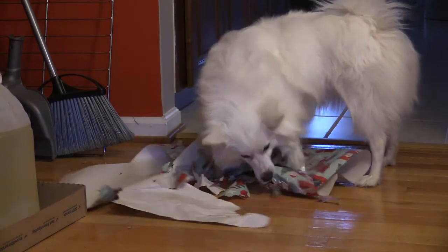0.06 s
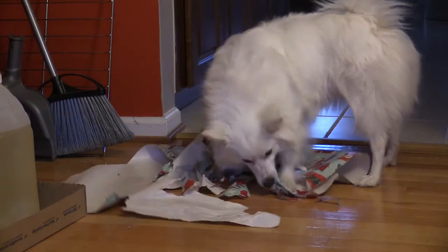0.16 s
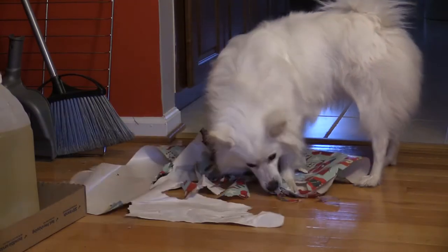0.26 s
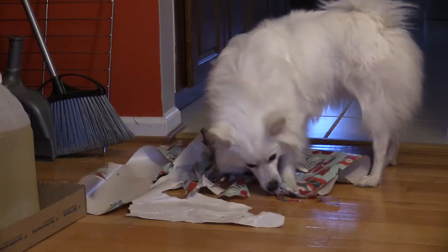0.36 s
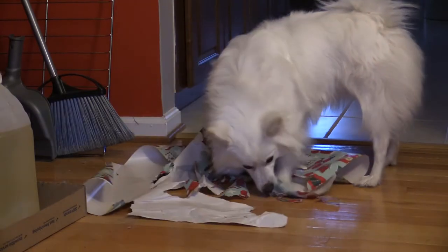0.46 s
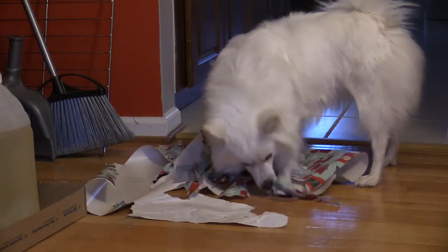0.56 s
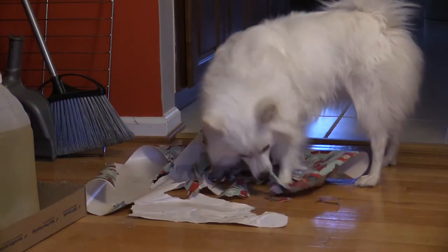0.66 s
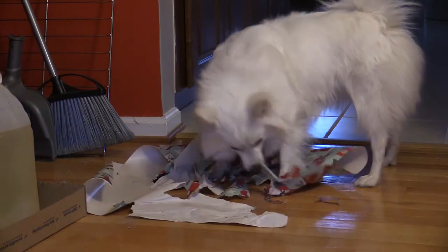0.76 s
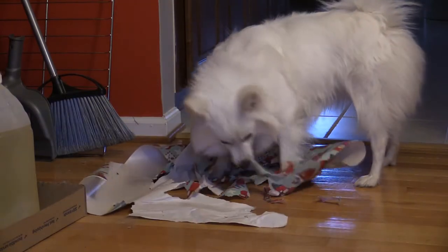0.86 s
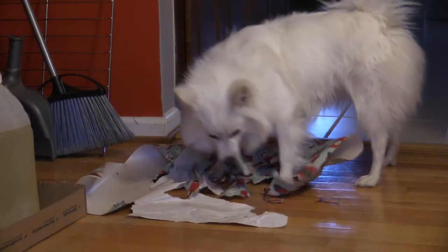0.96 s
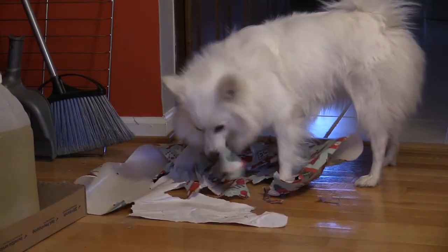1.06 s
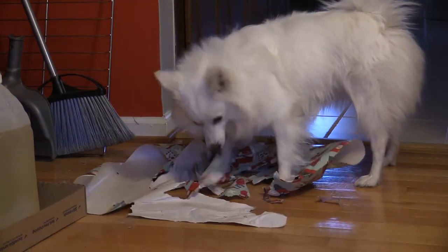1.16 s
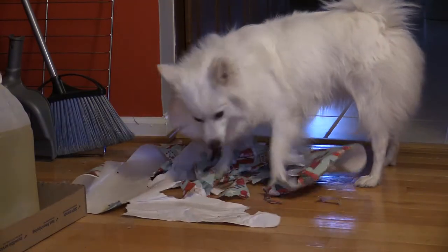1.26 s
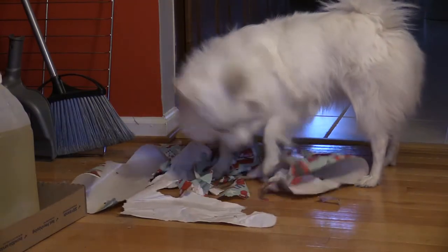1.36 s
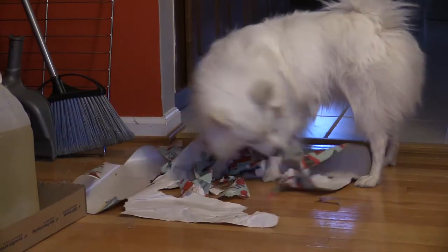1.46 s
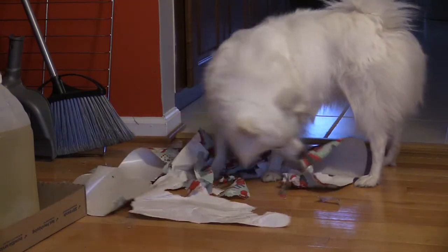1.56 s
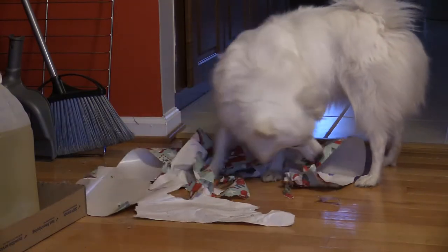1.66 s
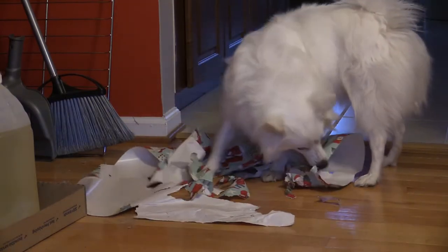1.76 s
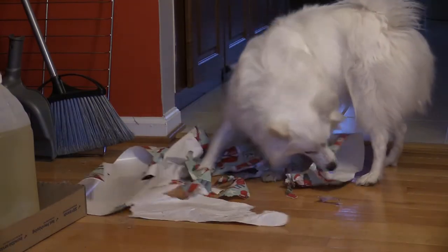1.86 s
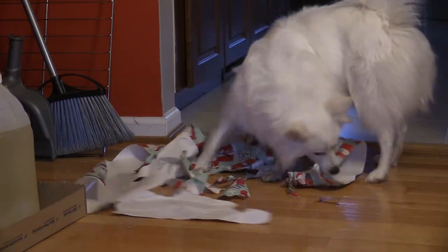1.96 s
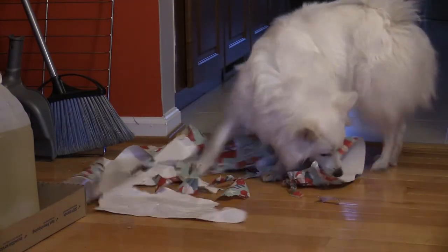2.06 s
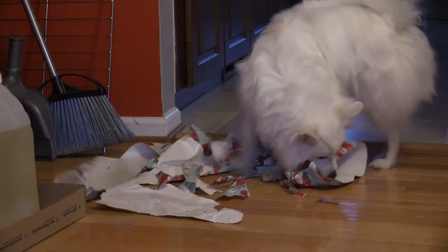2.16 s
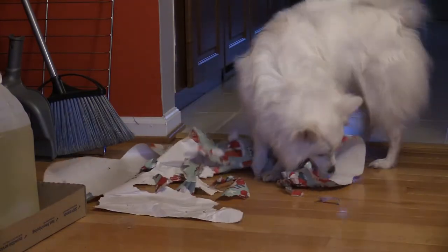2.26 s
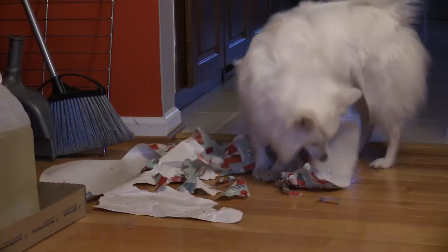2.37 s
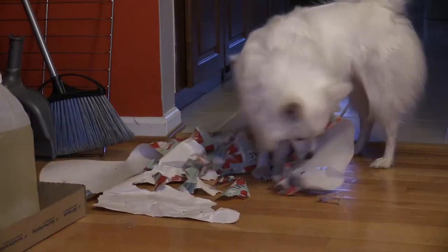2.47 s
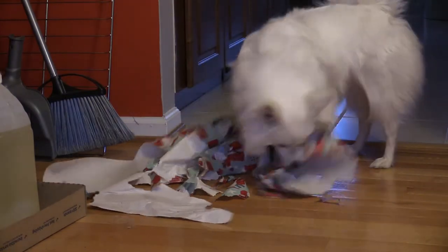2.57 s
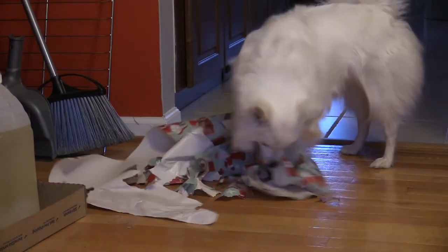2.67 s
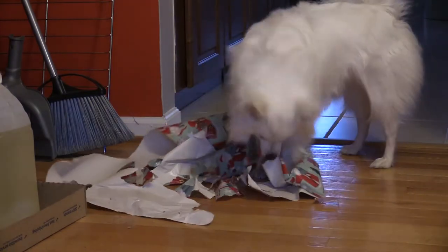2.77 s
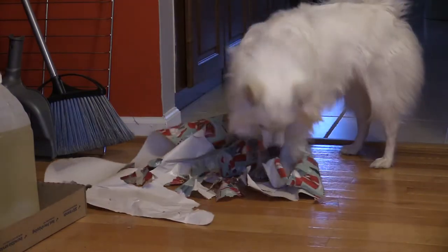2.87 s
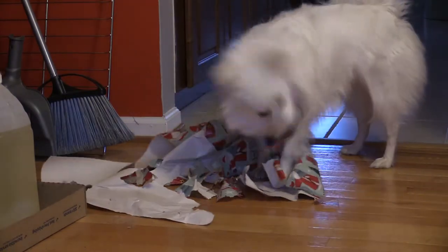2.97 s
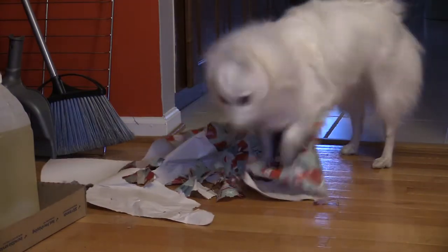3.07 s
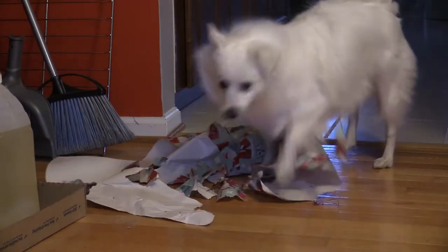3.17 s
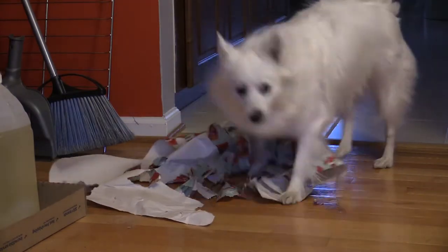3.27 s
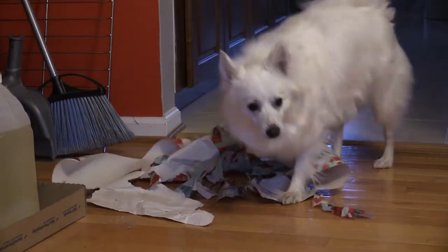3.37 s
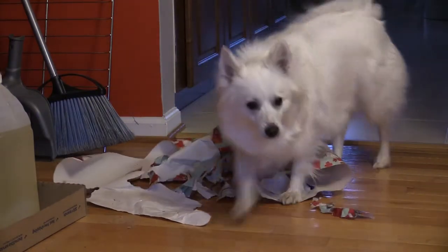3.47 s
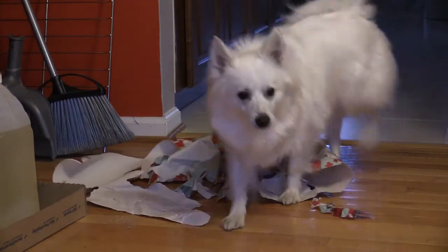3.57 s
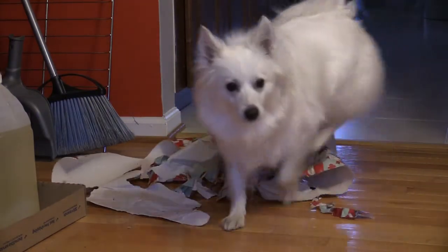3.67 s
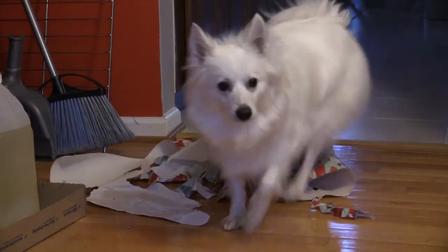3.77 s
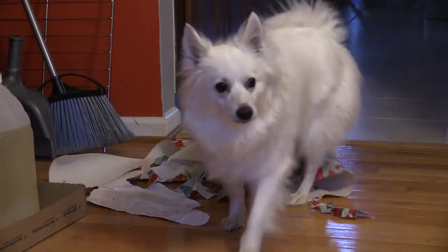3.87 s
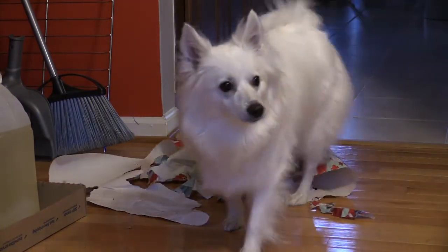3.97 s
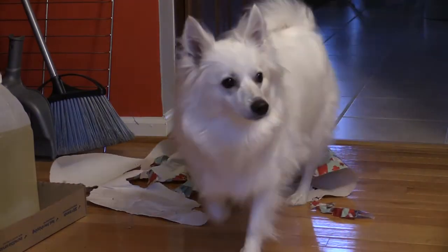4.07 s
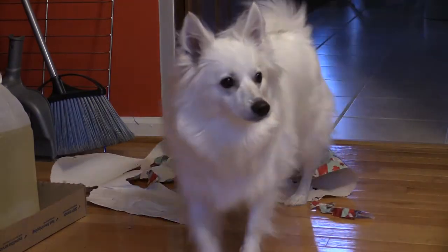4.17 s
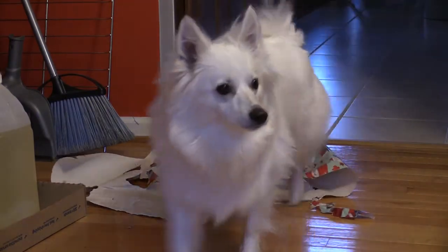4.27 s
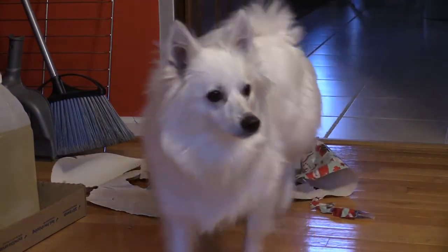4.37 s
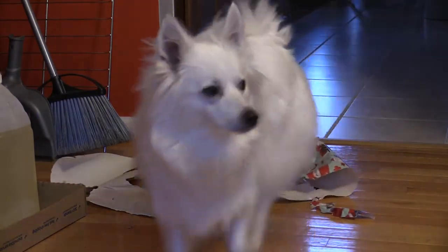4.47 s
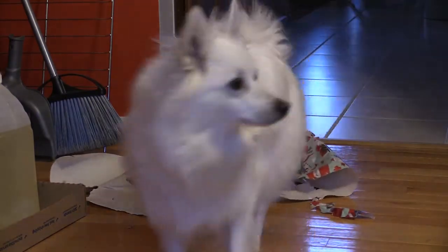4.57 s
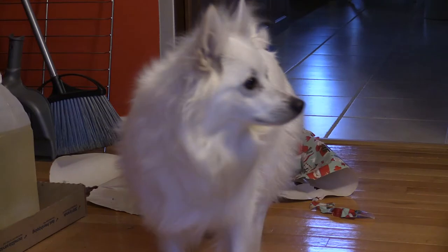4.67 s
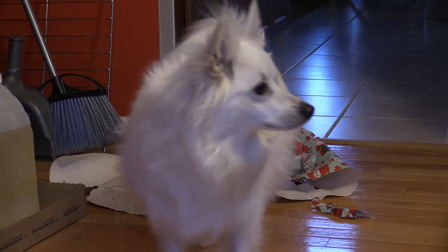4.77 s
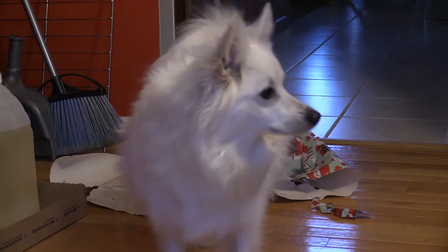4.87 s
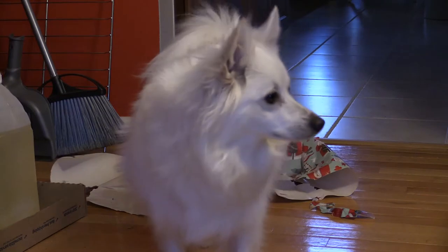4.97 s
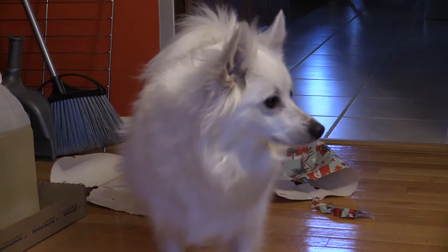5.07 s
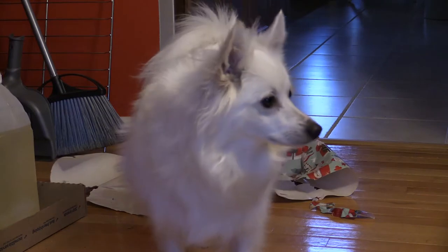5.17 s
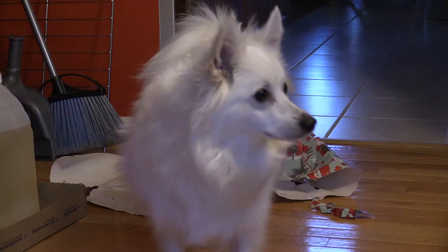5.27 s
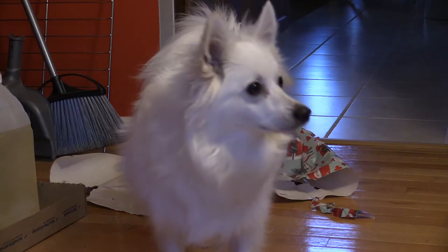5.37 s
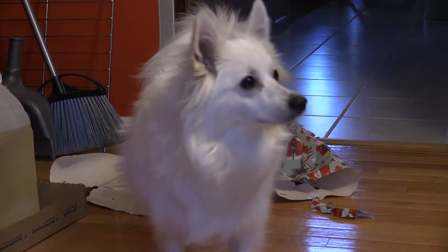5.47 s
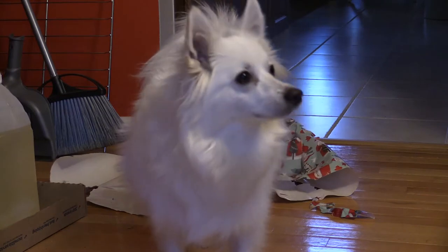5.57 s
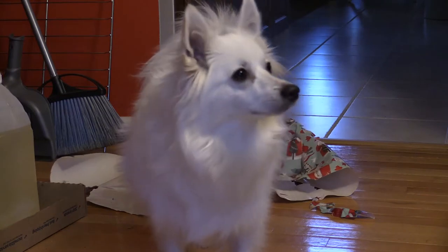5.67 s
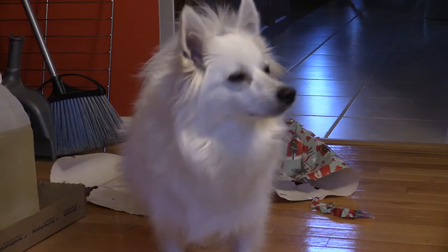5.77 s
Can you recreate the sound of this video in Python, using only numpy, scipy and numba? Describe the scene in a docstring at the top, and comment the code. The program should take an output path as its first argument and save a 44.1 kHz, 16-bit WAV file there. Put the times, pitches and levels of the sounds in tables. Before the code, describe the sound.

A dog rummages in torn wrapping paper on a wooden floor. Sharp crinkles thicken into a tearing rustle, thin to scattered snaps, then swell into the loudest crackling burst. As the dog steps off, small ticks and dull paw thuds remain, ending with a hollow knock and near quiet. Close stereo pickup in a small hard room, with short echoes and faint hiss.

```python
"""A small hard room with a wooden floor: a dog noses, drags and tears wrapping paper, then steps off it.
Creases buckle in tiny damped pops: dense showers while the sheet moves, single snaps under nose and paws.
Dry clicks give sharp ticks and some early echoes, short pitched rings glide, boards boom under weight.
Echoes and a short diffuse tail answer all but the dry clicks; a faint hum and hiss lie under it all."""
import sys
import numpy as np
from scipy import signal
from scipy.fft import rfft, irfft, next_fast_len
from scipy.io import wavfile
from scipy.ndimage import uniform_filter1d
from numba import njit

SR = 44100
rng = np.random.default_rng(int(sys.argv[2]) if len(sys.argv) > 2 else 0)


def persist_wave(psi):
    """Save psi, clipped to +-1, as 16-bit WAV."""
    counts = np.round(np.clip(psi, -1, 1) * 32767).astype(np.int16)
    wavfile.write(sys.argv[1], SR, np.atleast_2d(counts).T)


N = 256660  # length [samples]
PLACES = 5  # spots on the floor, each with its own echo pattern

# creases giving way under nose and paws: (time [s], relative level [dB], crease pitch [Hz],
# ring [dB], bass tilt [dB], treble tilt [dB], length of the run [ms])
CREASE_SNAPS = [(0.001, -28, 3020, -1.5, 8, -1, 8.9), (0.154, -16, 1460, -8, -59, 4, 8.4),
                (0.328, -31, 4900, 0, -28, -1, 1.7), (0.3527, -32.5, 3040, 10, -30, -16, 17.3),
                (0.367, -19, 3040, 0, -14, 2, 8.5), (0.4559, -18, 3240, -9, -7, 7.5, 11.7),
                (0.534, -20, 3100, 3, -20, -2, 4.4), (0.543, -25, 3000, -2, -25, -10, 5.1),
                (0.583, -14.5, 3180, -7, -25, 5.5, 5.4), (0.6273, -20, 2050, 7.5, -2, -11, 1.76),
                (0.6817, -14, 3850, 5, -25, 7, 4.1), (0.8245, -23, 2800, 2, -15, 16.5, 9),
                (0.919, -17, 1330, -2, -23, -18, 7.7), (0.958, -30, 1930, 7, -20, -10, 2.2),
                (1.279, -30.5, 1640, -3, -36, -2, 7.5), (1.3493, -24.5, 1940, -1, -28, -26, 7.2),
                (1.4105, -23.5, 1340, -7, -2, -2.5, 9.7), (1.451, -20, 2600, -5, -6, -7.5, 8.5),
                (1.714, -26.5, 3000, -5, -3, -25, 4), (1.8702, -27, 1550, 0, -22, 4, 8.5),
                (1.9032, -26, 2070, -9, -28, 2, 7.2), (2.0078, -36.5, 2450, 7, -15, 11.5, 3.3),
                (2.061, -25, 2210, 1, -26, -6, 10.4), (2.1384, -25.5, 1780, 5, -44, -12, 1.23),
                (2.1973, -19.5, 5600, -9, -25, 5, 7.3), (2.208, -18.5, 2110, -6, -6, 2, 11.9),
                (2.2737, -23.5, 4200, -7, -32, 3.5, 1.64), (2.3124, -17, 3100, -8, -10, 1, 14.3),
                (2.378, -26, 3570, -9, -23, 14, 4), (2.4544, -20, 754, -12, -18, 2, 8.1),
                (2.4637, -19.5, 4300, -4, -19, 4.5, 9.9), (2.5242, -17, 1920, -6, -1, 10.5, 8.2),
                (2.534, -15, 2070, -8, 0, 1, 7), (2.5533, -14.5, 2310, -12, -10, -10, 5.5),
                (2.6107, -14.5, 1580, 1, -22, 8, 10.2), (2.624, -22, 1410, -1, -16, 6, 6),
                (2.66, -12, 2830, 4.5, -10, -10, 9.6), (2.6846, -10, 2000, 1, -4, 13.5, 9.2),
                (2.7029, -17, 2810, -12, -12, 6, 3.3), (2.773, -21, 4380, 13, -24, 4, 7.2),
                (2.855, -16, 1644, 4, -7, 3.5, 2.32), (2.874, -22.5, 1550, -10, -21, -21, 8),
                (3.0279, -20, 1890, -7, -9, -3, 6.2), (3.068, -22, 1390, -6, -15, -26, 18),
                (3.135, -26, 2550, 0, -15, -13, 5), (3.2161, -18.5, 3700, -7, -6, 1, 5),
                (3.3573, -32.5, 3400, 1, -28, 1.5, 11.4), (3.5212, -39, 1960, -1, -35, 11, 1.26),
                (3.666, -38.5, 2150, -7, -35, 4.5, 9.8), (3.6918, -38.5, 950, -5, -36, -11.5, 8.6),
                (3.786, -24.5, 3200, -8, -37, -2, 6.2), (3.795, -20.5, 3050, -15, -14, -12, 14.8),
                (4.0286, -29, 4280, -2, -8, -8, 1.9), (4.038, -44.5, 4660, 0, -35, 18, 15),
                (4.2524, -39, 3270, -12, -33, -13, 9), (4.3723, -26.5, 2000, -13, -2, -6, 5.8),
                (4.378, -22.5, 1910, -17, -17, -5, 17.5), (4.4762, -40, 4500, -4.5, -35, 2, 1.2),
                (4.6265, -29.5, 705, -12, -30, -29, 10), (4.652, -14.5, 1284, 4, -9, 7, 9.9),
                (4.663, -15, 917, 6, -14, 0, 5.6), (4.9897, -21, 590, 2.5, 0, 0.5, 12.4),
                (5.1572, -26, 2260, -3, -36, -23, 19), (5.2394, -40, 2660, -6, -37, -16, 8.4),
                (5.477, -37.5, 2340, -12, -35, 0.5, 4.5)]
# radiation colour of the paper: (frequency [Hz], relative spectral density [dB per Hz])
PAPER_COLOUR = [(35, -64), (60, -15), (139, -6), (198, -16), (268, -3.5), (338, -36), (480, -6),
                (785, -8.5), (1380, -1), (2250, -5.5), (3120, -3), (9570, -15.5), (13000, -18),
                (16000, -24)]
# where the dog stands: (time [s], left minus right [dB])
DOG_PAN = [(0, 1.3), (2.0, 1.1), (3.0, 1.5), (3.7, 1.5), (4.1, 0.3), (4.65, 1), (5.8, 0)]


def undb(db):
    """Amplitude gain is a power of ten of the level in decibels."""
    return 10 ** (np.asarray(db) / 20)


def over(table, hz):
    """Interpolates (frequency, value) points on a logarithmic frequency axis, as hearing spaces pitch."""
    table = np.array(table)
    return np.interp(np.log(hz), np.log(table[:, 0]), table[:, 1])


def pan_at(s):
    """Interchannel level difference [dB] that follows the dog's position."""
    return np.interp(s, *np.transpose(DOG_PAN))


def band(x, hz):
    """Band-pass filtering: half an octave between half-power points, with cosine skirts."""
    n = next_fast_len(x.shape[-1])
    f = np.fft.rfftfreq(n, 1 / SR) + 1e-9
    shape = np.cos(np.pi / 2 * np.clip(2 * np.log2(f / hz), -1, 1))
    return irfft(rfft(x, n) * shape, n)[..., :x.shape[-1]]


def walk(rate):
    """Low-pass random modulation: normal draws, rate [per s], joined by straight slews."""
    k = int(SR / rate)
    held = np.repeat(rng.standard_normal(N // k + 1), k)
    return uniform_filter1d(held, k)[:N]


@njit
def ring(out, place, start, hz, cycles, phase, left, right):
    """Damped oscillation: a sine decays by e every so many cycles; a faster decay shapes its onset."""
    for k in range(len(start)):
        slow = fast = np.exp(1j * phase[k])
        slow_step = np.exp((2j * np.pi - 1 / cycles[k]) * hz[k] / SR)
        fast_step = np.exp((2j * np.pi - 4 / cycles[k]) * hz[k] / SR)
        # six decay constants: about 50 dB down
        end = start[k] + int(6 * cycles[k] * SR / hz[k])
        for i in range(start[k], min(out.shape[2], end)):
            pop = (slow - fast).imag
            out[place[k], 0, i] += left[k] * pop
            out[place[k], 1, i] += right[k] * pop
            slow *= slow_step
            fast *= fast_step
    return out


def pops(s, hz, db, pan_db, cycles, chance):
    """Impulsive radiation: energy is scaled for decay time, then placed on the floor and in stereo."""
    size = undb(db) * np.sqrt(hz / cycles / SR)
    start = np.clip(s * SR, 0, N).astype(np.int64)
    # one random number gives both the spot and, by its remainder, the phase
    place = (chance * PLACES).astype(np.int64)
    phase = 2 * np.pi * (chance * PLACES % 1)
    left = size * undb(pan_db / 2)
    right = size * undb(-pan_db / 2)
    return ring(np.zeros((PLACES, 2, N)), place, start, hz, cycles, phase, left, right)


def hush(noise_db=-60.5, width=.6, balance_db=.8):
    """Stationary broadband noise with flickering low bands, plus a steady sinusoidal hum."""
    # colour of murmur and hiss: (frequency [Hz], relative spectral density [dB per Hz])
    noise_colour = [(15, -48), (25, -11), (123, -2), (185, -4.5), (285, 3), (427, -2.5), (503, -1.5),
                    (677, -6), (1020, -0.5), (1130, -7), (6210, -19), (12900, -28), (16000, -49)]
    # mains hum: (frequency [Hz], level before stereo balance [dB rms])
    hum_tones = [(121, -82.5)]
    noise = 0
    for hz in 25 * 2 ** np.arange(0, 9.6, .5):
        mid, side = band(rng.standard_normal((2, N)), hz)
        flicker_db = 2.5 * np.clip(np.log2(3000 / hz) / 3, .2, 1) * walk(14)
        pair = mid + width * side * np.array([[1], [-1]])
        noise = noise + undb(over(noise_colour, hz) + flicker_db) * pair
    noise = noise * undb(noise_db) / np.std(noise)
    t = np.arange(N) / SR
    hum = sum(np.sqrt(2) * undb(db) * np.sin(2 * np.pi * hz * t) for hz, db in hum_tones)
    return (noise + hum) * undb([[balance_db], [-balance_db]])


def motion_db(s, settle_db=-26, settle_db_per_s=126):
    """Power addition: the dog's pull plus the sheet's exponentially fading crackle after each snap."""
    # how hard the sheet is moved: (time [s], relative level [dB])
    pull = [(0, -50), (.06, -48.5), (.13, -48), (.3, -51), (.52, -47.5), (.575, -37.5), (.61, -31.5),
            (.66, -31.5), (.72, -29.5), (.78, -30), (.86, -33.5), (.925, -31.5), (.98, -60), (1.1, -60.5),
            (1.2, -54), (1.27, -48), (1.36, -47), (1.47, -51.5), (1.6, -46.5), (1.68, -56.5), (1.76, -47),
            (1.9, -40), (2.05, -43), (2.12, -36), (2.18, -47.5), (2.3, -45), (2.35, -38.5), (2.55, -39),
            (2.63, -20.5), (2.69, -24), (2.74, -24), (2.78, -26.5), (2.84, -32), (2.92, -64), (2.96, -46),
            (3.01, -40), (3.08, -39), (3.2, -40.5), (3.27, -39), (3.35, -45), (3.5, -59.5), (3.7, -56),
            (4.1, -65.5), (5.82, -83)]
    power = undb(2 * np.interp(s, *np.transpose(pull)))
    for start, db, *_ in CREASE_SNAPS:
        settling_db = db + settle_db - settle_db_per_s * np.abs(s - start)
        power = power + (s > start) * undb(2 * settling_db)
    return 10 * np.log10(power)


def rustle(count=17000, scatter_db=3.0, cycles=0.82, ring_cycles=6, gust_db=1.1, gain_db=14):
    """Crackling noise: a shower of random pops, small creases high and many, big folds low."""
    # colour of the shower: (time [s], bass tilt [dB], treble tilt [dB],
    # pitch of the air pocket between the sheets [Hz], its ring [dB])
    pocket_course = [(0, 9, 8, 1980, -12), (.1, -10, 0, 2530, -10), (.25, -17, -2, 3100, -1.5),
                     (.42, 2, 2, 3050, -7), (.55, -5, 1, 3130, -19), (.6, -2.5, 8.5, 2080, -14),
                     (.67, -2, 8.5, 3320, -8), (0.751, 0, 4.5, 3150, -12), (.9, 2, 4, 3040, -5),
                     (1.25, -15, -0.5, 1840, -3), (1.45, 11, 3.5, 2160, -5), (1.6, -1, -1.5, 1900, -2),
                     (1.8, -10, -6, 1630, 1), (2.04, 1.5, -1, 1500, -17), (2.12, -20, -3.5, 1600, -13),
                     (2.19, 10, 7, 1820, -8), (2.25, -2, 2, 2130, 3), (2.4, 4, -1, 2380, -4),
                     (2.63, 1.5, 0, 1390, -11), (2.718, 2, 2, 1510, -5), (2.739, -10, 6, 2950, -2),
                     (2.8, 1, 8.5, 2870, -5), (2.86, 6, 9.5, 1580, -3), (2.89, 10, 7, 1560, -6),
                     (2.96, 3, -4, 1760, 3), (3.02, -1, -5, 1710, -13), (3.08, -3.5, -7, 1510, -12),
                     (3.2, -3.5, -7, 1700, -19), (3.4, 5, -2.5, 2280, -6), (4.4, 4, 2.5, 1900, -6),
                     (4.7, -6, -3.5, 1225, -3), (5.2, 2, -17, 2280, 1)]
    # hollow scrape of the big fold dragged on the boards: (time [s], pitch [Hz], ring [dB])
    fold_course = [(0, 525, -10), (.3, 497, -20), (.6, 442, 24.5), (.66, 515, 9), (.75, 595, 0),
                   (.93, 624, 6), (1.4, 453, -6), (2.2, 470, 0), (2.32, 720, 9), (2.42, 737, 7),
                   (2.55, 740, 11.5), (2.63, 487, 2), (2.72, 475, 1), (2.849, 475, -6.5), (3.2, 573, -5),
                   (4.4, 474, -20), (5.82, 480, -12)]
    u = rng.random((count, 7)).T
    # one crease gives four pops at once, from one spot: a broad click
    u[[0, 2, 4]] = np.repeat(u[[0, 2, 4], ::4], 4, axis=1)
    u[5] = (np.repeat(rng.integers(0, PLACES, count // 4), 4) + u[5]) / PLACES
    s = u[0] * N / SR
    hz = 90 * 2 ** (7.5 * u[1] ** .7)
    db = motion_db(s)
    t, *columns = np.transpose(pocket_course)
    body_db, edge_db, pocket_hz, pocket_db = (np.interp(s, t, c) for c in columns)
    t, *columns = np.transpose(fold_course)
    fold_hz, fold_db = (np.interp(s, t, c) for c in columns)
    pocket = u[6] < .08
    fold = u[6] > .96
    rings = pocket | fold
    # the hollows change shape all the time: pitch drifts, the ring breaks up, the colour tips
    at = (u[0] * N).astype(int)
    drift_oct = 0.06 * walk(30)[at]
    broken_db = 4.5 * walk(35)[at]
    tip_db = 1.5 * walk(40)[at]
    hollow_hz = np.where(fold, fold_hz, pocket_hz) * 2 ** (0.17 * (u[1] - .5) + drift_oct)
    hz = np.where(rings, hollow_hz, hz)
    octave = np.log2(hz / 2000)
    colour = over(PAPER_COLOUR, hz) + 10 * np.log10(hz / 2000)  # density to octave power
    colour = colour + pocket * pocket_db + fold * fold_db + rings * broken_db
    colour = colour + tip_db * np.clip(octave, -2, 2)
    colour = colour + body_db * np.clip(-octave / 2, 0, 1) + edge_db * np.clip(octave / 2, 0, 1)
    # bunches come and go
    bunch_db = gust_db * (walk(200) + walk(70) + walk(35.08))[at]
    # most creases are small, a few large, none larger than the sheet allows
    size_db = scatter_db * np.minimum(-np.log(u[2]), 3.8) + bunch_db
    length = np.where(rings, ring_cycles, cycles) * (.5 + u[3])
    pan_db = pan_at(s) + 2.0 * (2 * u[4] - 1)
    return pops(s, hz, db + gain_db + colour + size_db, pan_db, length, u[5])


def snaps(count=90, peak_db=4, peak_oct=0.8, cycles=0.64, ring_cycles=4.0, gain_db=-1.5, fade_db=3,
          front=.3, front_ms=.5):
    """Buckling instability: a sharp front, then a quick run of pops, one in fifteen ringing on pitch."""
    s, db, crease_hz, ring_db, body_db, edge_db, ms = np.array(CREASE_SNAPS).T[:, :, None]
    u = rng.random((len(s), 5, count)).transpose(1, 0, 2)
    rings = np.arange(count) % 15 == 7
    hz = 130 * 2 ** (6.9 * (np.arange(count) + u[0]) / count)  # evenly spread in octaves
    hz = np.where(rings, crease_hz * 2 ** (0.19 * (u[0] - .5)), hz)
    octave = np.log2(hz / crease_hz)
    colour = peak_db * np.exp(-(octave / peak_oct) ** 2)
    colour = colour + over(PAPER_COLOUR, hz) + 10 * np.log10(hz / 2000)
    colour = colour + body_db * np.clip(-octave / 3, 0, 1)
    colour = colour + edge_db * np.clip(np.log2(hz / 2500) / 2, 0, 2)
    # the front share of the pops starts together, the rest follow over the run
    run = np.abs(ms) / 1000 * np.clip((u[1] - front) / (1 - front), 0, 1)
    late = run + front_ms / 1000 * u[0]
    size_db = db + gain_db + colour + ring_db * rings + 6.88 * u[2] - fade_db * u[1]
    length = np.where(rings, ring_cycles, cycles) * (.5 + u[3])
    columns = (s + late, hz, size_db, pan_at(s), length, u[4])
    return pops(*(np.ravel(v + 0 * hz) for v in columns))


def room(dry, tail_db=-23.0, build_ms=7, wander_ms=1.5):
    """Reverberation by convolution: direct sound, early reflections, then a diffuse decaying tail."""
    # reverberation time: (frequency [Hz], time to fall 60 dB [s])
    decay_time = [(100, 0.21), (300, 0.2), (800, 0.24), (2000, 0.25), (5000, 0.23), (13000, 0.18)]
    # likeness of left and right in the tail: (frequency [Hz], correlation [0 to 1])
    likeness = [(100, 1), (400, 0.88), (800, 0.6), (4000, 0.73), (13000, 0.88)]
    # floor and walls: (earliest delay [ms], level re direct sound [dB])
    reflections = [(2.5, -5), (8.5, -2), (12.5, -6.5), (25.0, -15)]
    t = np.arange(int(.5 * SR)) / SR
    tail = 0
    for hz in 30 * 2 ** np.arange(0, 9.6, .5):
        mid, side = band(rng.standard_normal((2, PLACES, 1, len(t))), hz)
        alike = np.clip(over(likeness, hz), 0, 1)
        pair = np.sqrt(1 + alike) * mid + np.sqrt(1 - alike) * side * np.array([[1], [-1]])
        tail = tail + pair * undb(-60 * t / over(decay_time, hz))
    response = undb(tail_db) * tail * (1 - np.exp(-(1000 * t / build_ms) ** 2))
    response[:, :, 0] += 1  # direct sound
    spots = np.arange(PLACES)
    for k, (ms, db) in enumerate(reflections):
        i = ((ms + wander_ms * rng.random(PLACES)) * SR / 1000).astype(int)
        # each echo reaches one side a few samples earlier, the sides taking turns
        lead = rng.integers(1, 6, PLACES)
        response[spots, 0, i + lead * (k % 2)] += undb(db)
        response[spots, 1, i + lead * (1 - k % 2)] += undb(db)
    n = next_fast_len(N + len(t))
    return irfft((rfft(dry, n) * rfft(response, n)).sum(axis=0), n)[:, :N]


def dry_clicks(count=12, spread_oct=1.51, length_ms=2.556, cycles=1.46, gain_db=14):
    """Superposed transients: a dozen pops around one pitch within a few milliseconds, without room."""
    # dry clicks heard without room: sharp ticks, and some early echoes of snaps and steps:
    # (time [s], relative level [dB], pitch [Hz])
    clicks = [(0.0203, -39, 4500), (0.1535, -42, 1510), (0.5835, -28, 3500), (0.6284, -23, 1700),
              (0.661, -28, 3200), (0.6847, -20.5, 2570), (0.7125, -27, 3600), (0.7205, -29, 2500),
              (0.829, -31, 2900), (0.841, -28, 2610), (1.7177, -37, 3230), (2.0096, -35.5, 2380),
              (2.1378, -28.5, 1910), (2.1475, -41, 1810), (2.2746, -32, 4200), (2.4683, -27.5, 4300),
              (2.661, -27, 2800), (2.6805, -24, 1500), (2.691, -25, 2000), (2.7045, -20, 2800),
              (2.8555, -20, 1580), (3.222, -31, 4040), (3.7945, -34, 3000), (4.0295, -53, 4100),
              (4.4775, -44, 4970), (4.657, -27, 1200), (4.663, -24, 1080), (4.6674, -21, 1320),
              (4.684, -30.5, 1190), (4.9932, -37, 1310), (5.0065, -31, 2600), (5.158, -47, 2200),
              (5.174, -39, 2700)]
    s, db, hz = np.array(clicks).T[:, :, None]
    u = rng.random((len(s), 3, count)).transpose(1, 0, 2)
    hz = hz * 2 ** (spread_oct * (u[0] - .5))
    late = length_ms / 1000 * u[1] ** 2  # crowded towards the start
    columns = (s + late, hz, db + gain_db, pan_at(s), cycles, u[2])
    return pops(*(np.ravel(v + 0 * hz) for v in columns)).sum(axis=0)


def thuds(cycles=0.92, gain_db=14, pan_db=3.5):
    """Heavily damped resonance: the boards give a short dull boom under each shift of weight."""
    # paws and body weight on the boards: (time [s], relative level [dB], pitch [Hz])
    footfalls = [(0.036, -41, 111), (0.472, -35, 95), (0.539, -44, 88.8), (0.949, -27, 196),
                 (1.017, -37.5, 91), (1.406, -33, 184), (1.909, -36, 78.1), (1.979, -42, 53.8),
                 (2.069, -45, 45.8), (2.641, -33, 160), (2.69, -39, 261), (3.222, -29, 265),
                 (3.25, -35, 98.5), (3.521, -50, 112), (4.177, -41, 142), (4.654, -22, 270),
                 (4.701, -28, 280), (4.986, -35, 257), (5.439, -42, 171)]
    s, db, hz = np.transpose(footfalls)
    booms = pops(s, hz, db + gain_db, pan_db + 0 * s, cycles + 0 * s, rng.random(len(s)))
    return signal.sosfilt(signal.butter(2, 42, "high", fs=SR, output="sos"), booms)


def pitched_rings(count=60, cycles=6, spread_oct=0.17, fade_db=6, scatter_db=5):
    """Narrow resonance: a quick train of damped pops glides from a first pitch to a last."""
    # short pitched rings: a sliding edge or fold, and the hollow knock of a step at 4.65 s:
    # (time [s], length [s], first pitch [Hz], last pitch [Hz], relative level [dB])
    glides = [(0.608, 0.046, 2080, 2080, -34), (2.083, 0.16, 1500, 2030, -44),
              (2.868, 0.087, 1580, 1750, -48), (4.648, 0.02, 1353, 1090, -31.5),
              (5.16, 0.03, 2160, 2530, -56)]
    s, length, first_hz, last_hz, db = np.array(glides).T[:, :, None]
    u = rng.random((len(s), 4, count)).transpose(1, 0, 2)
    part = (np.arange(count) + u[0]) / count
    glide_hz = first_hz * (last_hz / first_hz) ** part
    hz = glide_hz * 2 ** (spread_oct * (u[1] - .5))
    # the level is shared out among the pops
    size_db = db + 10 * np.log10(length * SR / count) - fade_db * part + scatter_db * (u[2] - .5)
    columns = (s + length * part, hz, size_db, pan_at(s), cycles, u[3])
    return pops(*(np.ravel(v + 0 * hz) for v in columns))


def scene():
    """Superposition: paper, rings and paws in the room, dry clicks and the quiet background."""
    # a thin sheet radiates no deep bass, and the air softens its highest treble
    paper = rustle() + snaps() + pitched_rings()
    paper = signal.sosfilt(signal.butter(4, 140, "high", fs=SR, output="sos"), paper)
    paper = signal.sosfilt(signal.butter(2, 11000, fs=SR, output="sos"), paper)
    return room(paper + thuds()) + dry_clicks() + hush()


def record(dry, top_hz=15900):
    """Band limiting: the microphones lose the deepest bass, and a steep low-pass cuts the top."""
    dry = signal.sosfilt(signal.butter(1, 30, "high", fs=SR, output="sos"), dry)
    return signal.sosfilt(signal.ellip(12, .2, 100, top_hz, fs=SR, output="sos"), dry)


dry = scene()
out = record(dry)
persist_wave(out)
```